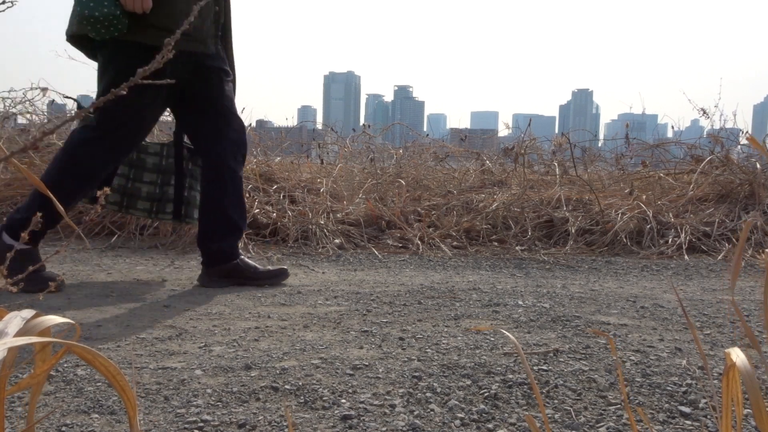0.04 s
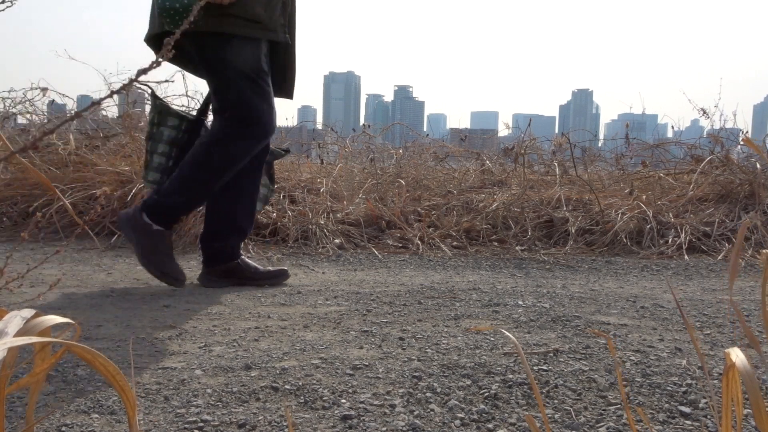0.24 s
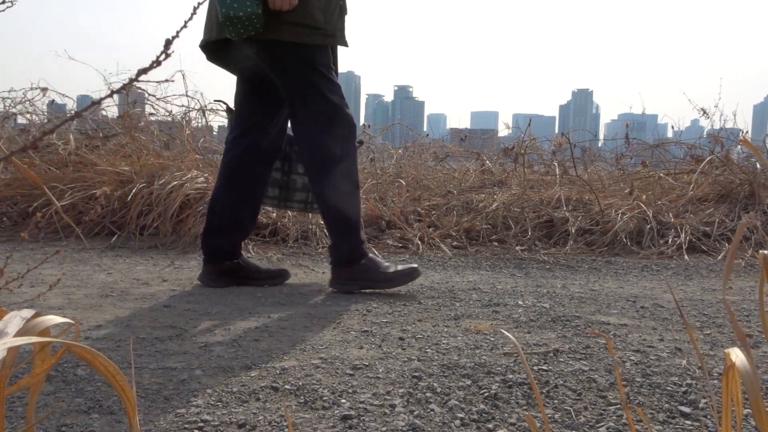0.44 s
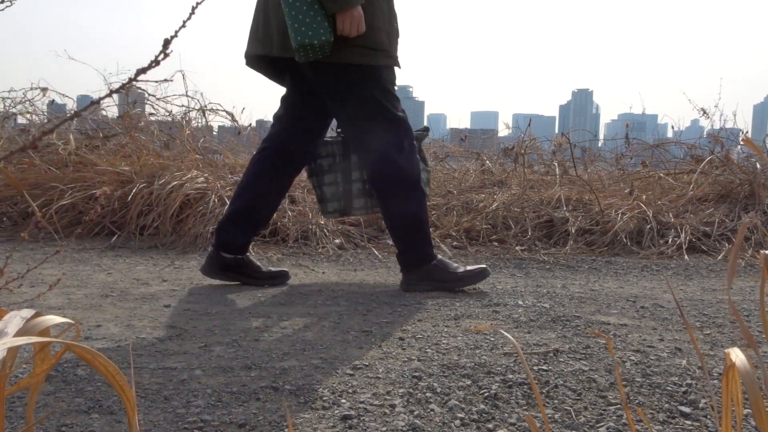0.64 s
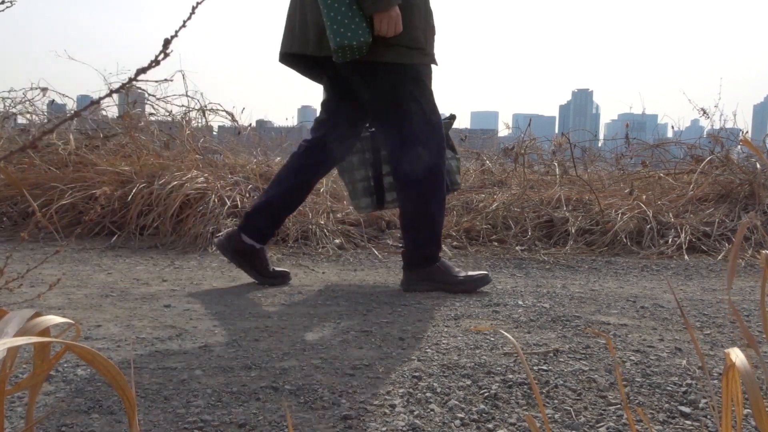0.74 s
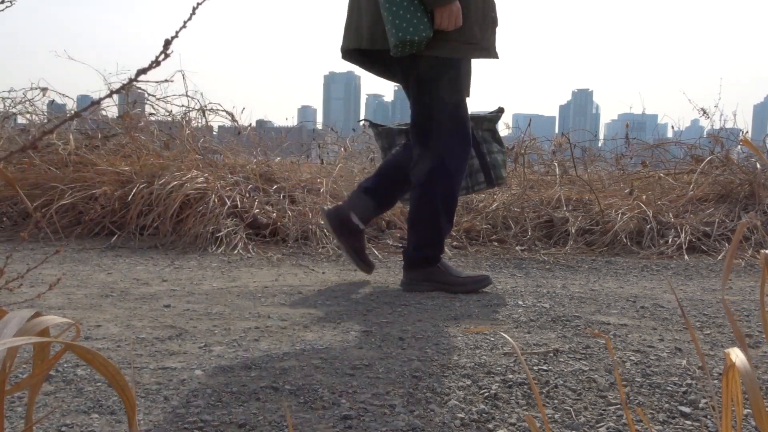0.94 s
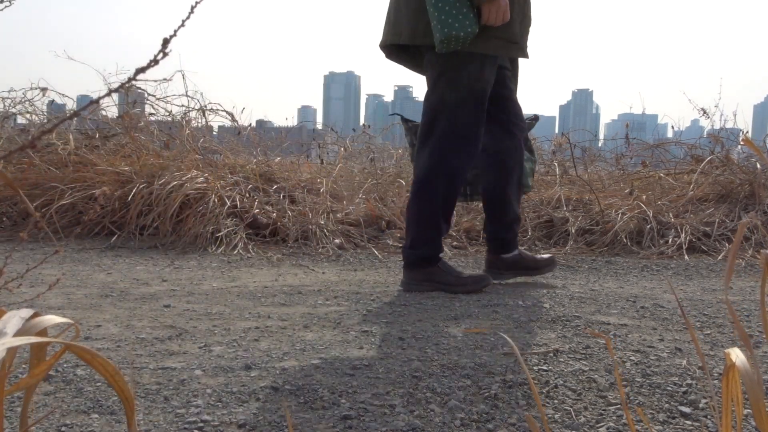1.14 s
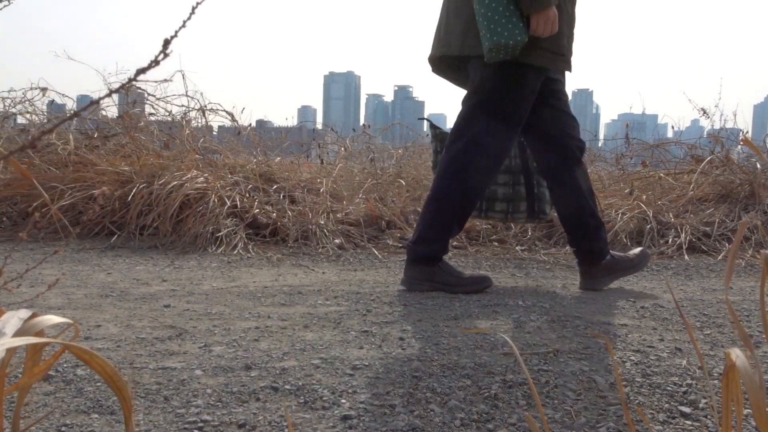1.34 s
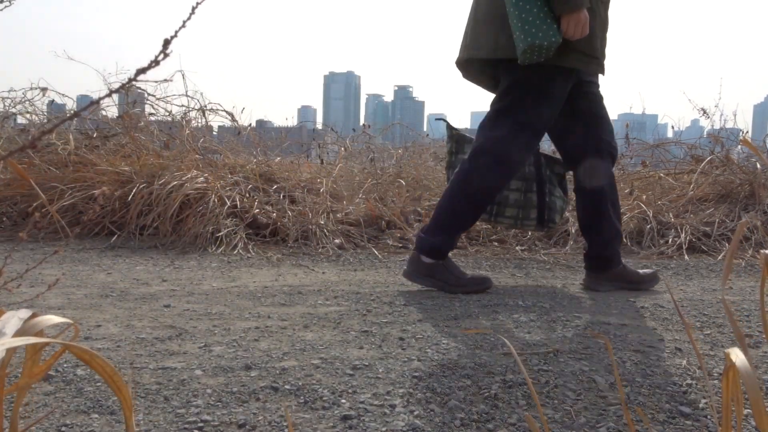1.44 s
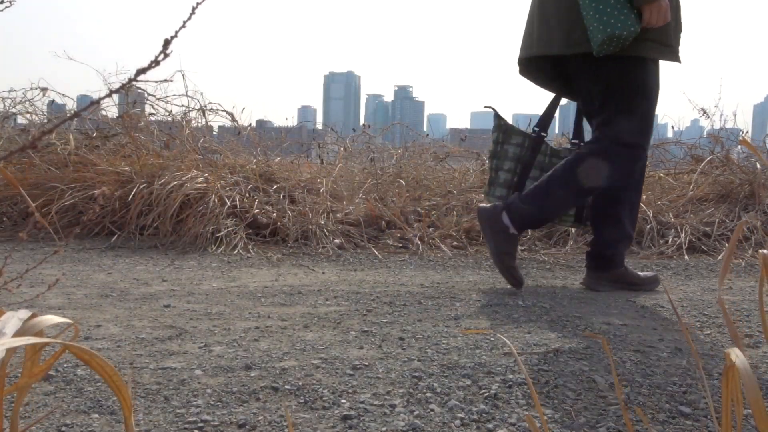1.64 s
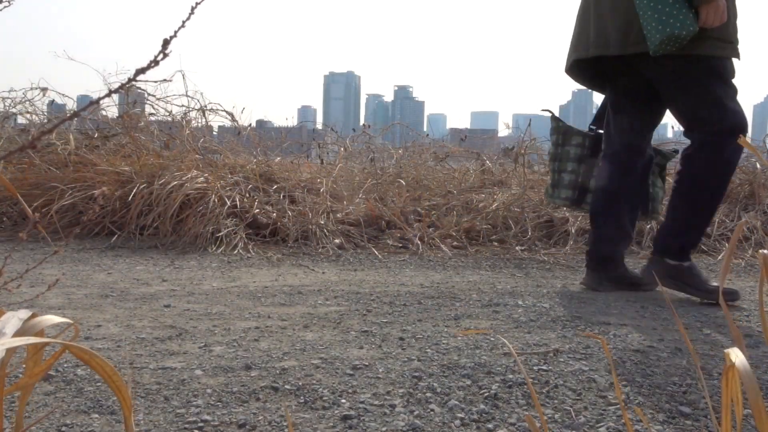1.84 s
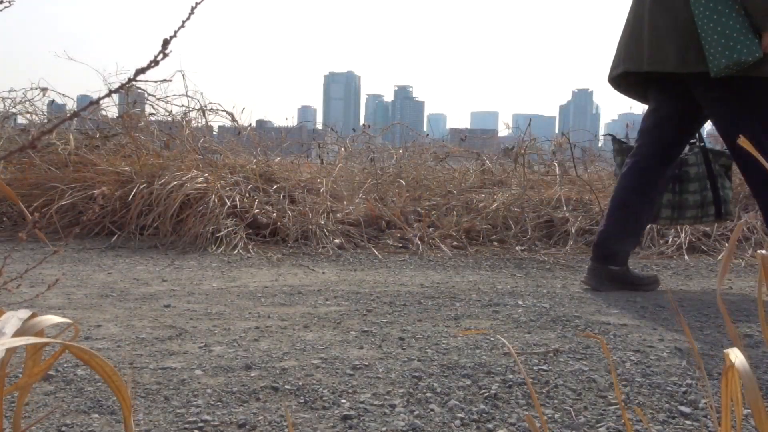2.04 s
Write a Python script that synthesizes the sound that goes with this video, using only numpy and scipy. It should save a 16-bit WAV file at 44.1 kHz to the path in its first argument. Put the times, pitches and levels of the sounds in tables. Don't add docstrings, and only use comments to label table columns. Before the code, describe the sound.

Footsteps crunching on gravel, hard soles walking past close by from left to right outdoors

```python
import sys
import numpy as np
from scipy import signal
from scipy.io import wavfile
from scipy.ndimage import uniform_filter1d, map_coordinates

SR = 44100
rng = np.random.default_rng(int(sys.argv[2]) if len(sys.argv) > 2 else 0)


def bounce(signal):
    frames = np.transpose(np.atleast_2d(signal))
    limited = np.clip(frames, -1, 1)
    pcm = np.round(limited * 32767).astype(np.int16)
    wavfile.write(sys.argv[1], SR, pcm)


def invert_db(x):
    u = np.asarray(x, float) / 20
    return 10 ** u


N = 92213

# pitch_hz, level_db (per Hz)
WASH_TONE = [(18, -47), (30, -11), (202, -5), (395, -6.5), (425, -3.5), (481, -0.5), (698, -2.5),
             (1540, -5.5), (11200, -27), (14600, -92), (22000, -120)]
# pitch_hz, likeness (1 = same)
WASH_LIKENESS = [(60, 0.99), (130, 1.0), (260, 0.98), (560, 0.93), (1170, 0.5), (2460, 0.11), (5170, 0.027),
                 (10900, 0.05)]
# pitch_hz, level_db
WASH_LEAN = [(60, 0), (400, -.3), (1100, -2), (2000, -2.5), (10900, -.5)]
# pitch_hz, width_hz, level_db
HUMS = [(381.4, 46, -63), (450, 65, -72)]
# time_s, level_db
HUM_SWELL = [(0, -4), (.12, 4), (.3, -7.5), (.7, 3), (.9, -6), (1.15, -6), (1.3, 1), (1.6, -5.5), (1.85, 4),
             (2.09, -7)]
# start_s, length_s, level_db, pitch_hz, width_hz
SQUEAKS = [(.1, .04, -57, 2040, 90), (.12, .09, -54, 1545, 70), (.195, .06, -56, 1545, 70),
           (.26, .05, -59, 1545, 70), (.125, .035, -58, 1800, 90), (.15, .07, -54, 1905, 60),
           (.21, .045, -53, 1905, 80), (.25, .05, -59, 1890, 60), (.185, .045, -59, 2160, 70),
           (.24, .08, -56, 2160, 90), (.325, .03, -63, 2130, 100), (.255, .035, -55, 970, 110),
           (.452, .035, -53, 1334, 120), (.655, .018, -48, 1600, 600), (0, .22, -64, 5400, 1600),
           (.2, .35, -70, 5400, 1400), (1.55, .04, -50, 4700, 1800)]
# peak_s, peak_db, pitch_hz
PEBBLES = [(0.0085, -49, 4380), (0.0444, -41, 2000), (0.0546, -42, 2770), (0.113, -56, 4380),
           (0.1424, -54, 5330), (0.1599, -38, 2430), (0.2227, -53, 3840), (0.2255, -52, 3600),
           (0.2257, -56, 4990), (0.2499, -58, 5330), (0.2584, -57, 5330), (0.2584, -54, 3370),
           (0.2629, -46, 800), (0.2686, -42, 1040), (0.3712, -49, 1350), (0.4567, -48, 850),
           (0.4582, -47, 1870), (0.5271, -48, 1750), (0.5695, -52, 2430), (0.6503, -41, 1180),
           (0.6625, -38, 1640), (0.666, -39, 1440), (0.6897, -36, 1180), (0.6917, -36, 1180),
           (0.7004, -34, 2770), (0.754, -43, 910), (0.7765, -47, 3160), (0.8191, -46, 1110),
           (0.9129, -53, 2770), (1.1716, -48, 1440), (1.2928, -49, 2430), (1.317, -46, 1640),
           (1.3933, -42, 2130), (1.4066, -51, 4100), (1.4098, -42, 2770), (1.4674, -37, 2770),
           (1.5205, -37, 1540), (1.5557, -45, 4680), (1.5607, -37, 4990), (1.5629, -36, 4380),
           (1.5677, -30, 2280), (1.5687, -43, 4680), (1.5717, -35, 970), (1.5822, -44, 5690),
           (1.5834, -33, 1870), (1.6128, -40, 970), (1.6298, -46, 2770), (1.6433, -52, 4380),
           (1.647, -42, 1180), (1.6607, -46, 2770), (1.664, -60, 8430), (1.6949, -44, 2430),
           (1.7388, -46, 2130), (1.7475, -46, 750), (2.0818, -48, 2590), (2.0818, -39, 850)]
# peak_s, peak_db, pitch_hz
CHIPS = [(.56, -42, 4750), (.5597, -52, 5850), (.5597, -65, 7500), (.878, -42, 3630), (.6972, -42.5, 4230),
         (1.4146, -30.5, 3850), (1.5655, -35, 1280), (.6893, -34.5, 3300), (.7115, -50, 2180),
         (.7135, -50, 1900), (1.4146, -53, 7700), (1.8097, -49, 4720), (1.8097, -51.5, 6040),
         (1.9782, -61, 5800), (2.0755, -48, 2000), (2.0835, -47, 700), (2.086, -43, 1140)]
# peak_s, peak_db, pitch_hz, brightness_db
STONE_CRACKS = [(0.0037, -26, 1910, -15), (0.0219, -35, 1570, -17), (0.055, -34, 1360, -9),
                (0.0781, -40, 1800, -12), (0.135, -37, 1840, -20), (0.161, -41, 2400, -18),
                (0.1665, -40, 1980, -5), (0.2234, -43, 1610, -11), (0.2568, -42, 1390, -15),
                (0.4672, -50, 1370, -1), (0.4967, -47, 1320, -5), (0.5595, -36, 2550, -1),
                (0.5768, -41, 2110, -18), (0.6505, -38, 710, -9), (0.6567, -38, 2970, -4),
                (0.6746, -28, 2900, -7), (0.6762, -26, 1640, -19), (0.6865, -31, 1730, -17),
                (0.6917, -28, 2590, -24), (0.6968, -23, 3100, -22), (0.6973, -18, 1640, -21),
                (0.7007, -26, 1510, -19), (0.7277, -36, 2980, -14), (0.7398, -40, 2270, -3),
                (0.7624, -38, 2710, -7), (0.7928, -37, 1430, -20), (0.8254, -39, 1550, -16),
                (0.8499, -40, 2390, -10), (0.878, -30, 2470, -16), (0.8788, -35, 2200, -17),
                (1.3015, -39, 1930, -16), (1.3895, -40, 3330, -11), (1.3994, -35, 2730, -16),
               (1.41, -38, 2030, -3), (1.4148, -8, 2060, -29), (1.4182, -30, 1820, -18),
               (1.4331, -34, 2010, -11), (1.4502, -27, 2350, -11), (1.4672, -35, 3000, -6),
               (1.4685, -32, 1320, -14), (1.4885, -33, 2220, -11), (1.5118, -34, 980, -14),
               (1.5303, -22, 2240, -23), (1.552, -29, 2030, -17), (1.5545, -31, 1100, -20),
               (1.558, -29, 2580, -13), (1.5607, -36, 2400, -3), (1.5633, -25, 2340, -12),
               (1.5677, -36, 2240, -15), (1.5717, -24, 2290, -15), (1.5748, -23, 2310, -23),
               (1.5768, -24, 2010, -12), (1.5835, -26, 1020, -18), (1.5855, -30, 1560, -15),
               (1.6641, -29, 2300, -17), (1.6946, -38, 800, -9), (1.8089, -51, 3120, -1),
               (1.9782, -49, 3000, 1), (2.0771, -38, 1440, -17), (2.0835, -39, 950, -14)]
# time_s, level_db
STEP_LOADS = [
    [(0, -44), (.05, -51), (.16, -54), (.28, -56.5), (.33, -60.5), (.5, -63), (.6, -63.5)],
    [(.61, -68), (.65, -47), (.69, -44), (.705, -48.5), (.76, -51), (.85, -55), (.92, -62.5), (1.1, -66.5),
     (1.33, -61.5)],
    [(1.365, -61.5), (1.4, -47.5), (1.46, -49), (1.543, -46), (1.553, -39), (1.579, -41), (1.59, -51),
     (1.72, -56), (1.9, -61.5)],
    [(1.91, -61.5), (2.06, -61.5), (2.08, -56), (2.1, -32.5)],
]
# pitch_hz, level_db (per Hz)
GRIT_TONE = [(300, -19.5), (700, -9), (1000, -10), (2200, -0.5), (3500, -15), (5800, -23), (7000, -33),
             (11000, -34)]
# time_s, tilt_db (per octave above FIZZ_HZ)
FIZZ = [(0, 2.2), (.5, -4), (.62, 1), (1, 5), (1.4, 5), (1.565, 1.5), (1.7, 6.5), (2.09, 0)]

WASH_DB = -56
PEBBLE_S, CHIP_S, PEBBLE_DB = .00065, .001, 1
CRACK_S = .00039
TICK_HZ, TICK_S, TICK_DB = 4900, .00028, 1.5
AIR_HZ, AIR_DB = 8200, -13
THUD_HZ, THUD_DB = 500, -27
GRAINS_PER_S, GRAIN_SIZES, GRAIN_CYCLES = 11000, 30, 4
GRAIN_SPREAD_DB, CLUMP_DB, FIZZ_HZ = 2.9, 1.3, 2600
SCATTER_DB, SCATTER_T60_S = -15, .025
PAN_START_DB, PAN_END_DB, PAN_ABOVE_HZ = -.5, -6.8, 950
LAG_START, LAG_END = -1, 2.4
LOW_CUT_HZ, EDGE_HZ = 73, 11200


def evened(x):
    return x / np.sqrt(np.mean(x ** 2) + 1e-20)


def read(points, hz):
    f, value = np.transpose(points)
    return np.interp(np.log(hz + 1), np.log(f + 1), value)


def over_time(points):
    return np.interp(np.arange(N) / SR, *np.transpose(points))


def add(mix, s, sound):
    part = mix[max(round(s * SR), 0):][:len(sound)]
    part += sound[:len(part)]


def knock(hz, rise_s, size=400):
    u = np.arange(size) / SR / rise_s
    shape = (u * np.exp(1 - u)) ** 2
    x = shape * np.cos(2 * np.pi * hz * rise_s * (u - .72))
    return x - shape * x.sum() / shape.sum()


def resonate(x, hz, width):
    turn = np.exp(2j * np.pi * hz * np.arange(x.shape[-1]) / SR)
    r = np.exp(-np.pi * width / SR)
    return 2 * (turn * signal.lfilter([1 - r], [1, -r], x / turn)).real


def far_wash():
    frames, hz = N // 256 + 5, np.fft.rfftfreq(1024, 1 / SR)
    a, b, c, d, patches = rng.standard_normal((frames, 513, 5)).T
    patches = uniform_filter1d(uniform_filter1d(patches, size=10, axis=0), size=12, axis=1)
    patches = evened(patches)
    same = np.clip(read(WASH_LIKENESS, hz), -1, 1)[:, None]
    left = a + 1j * b
    right = same * left + np.sqrt(1 - same ** 2) * (c + 1j * d)
    lean = np.array([.5, -.5])[:, None, None] * read(WASH_LEAN, hz)[:, None]
    z = np.array([left, right]) * invert_db(read(WASH_TONE, hz)[:, None] + 0.29 * patches + lean)
    return invert_db(WASH_DB) * evened(signal.istft(z, nperseg=1024, noverlap=768)[1][:, :N])


def machine_hum():
    hum = np.zeros(N)
    for hz, width, db in HUMS:
        hum += invert_db(db) * evened(resonate(rng.standard_normal(N), hz, width))
    return invert_db(over_time(HUM_SWELL)) * hum


def sole_squeaks():
    out = np.zeros(N)
    for s, length, db, hz, width in SQUEAKS:
        n = int(length * SR)
        jerks = rng.standard_normal(18000) ** 3
        rub = resonate(resonate(jerks, hz, width), hz, width)[-n:]
        add(out, s, invert_db(db) * np.sqrt(np.hanning(n)) * evened(rub))
    return out


def knocked_pebbles():
    out = np.zeros(N)
    for rows, rise_s in ((PEBBLES, PEBBLE_S), (CHIPS, CHIP_S)):
        for s, db, hz in rows:
            add(out, s - rise_s, invert_db(db + PEBBLE_DB) * knock(hz, rise_s))
    return out


def cracking_stones():
    out = np.zeros(N)
    for s, db, hz, bright_db in STONE_CRACKS:
        rise_s = CRACK_S * np.sqrt(2100 / hz)
        add(out, s - rise_s, invert_db(db - 0.5) * knock(hz, rise_s))
        thud_s = .5 / THUD_HZ
        add(out, s - thud_s, invert_db(db + THUD_DB) * knock(THUD_HZ, thud_s))
        tick = knock(TICK_HZ * (1 + .06 * rng.uniform(-1, 1)), TICK_S)
        tick += invert_db(AIR_DB) * knock(AIR_HZ, TICK_S / 2)
        add(out, s - TICK_S, invert_db(db + bright_db + TICK_DB) * tick)
    return signal.sosfilt(signal.butter(2, 680, "high", fs=SR, output="sos"), out)


def grinding_gravel():
    clump = uniform_filter1d(uniform_filter1d(rng.standard_normal(N), size=200), size=200)
    clump = evened(clump)
    fizz = over_time(FIZZ)
    out = np.zeros((2, N))
    for hz in np.geomspace(480, 10500, GRAIN_SIZES):
        strength, chance, sign, side = rng.random((N, 4)).T
        hits = invert_db(GRAIN_SPREAD_DB * np.minimum(-np.log(strength + 1e-9), 3))
        hits *= chance < GRAINS_PER_S / GRAIN_SIZES / SR
        hits *= invert_db(fizz * max(np.log2(hz / FIZZ_HZ), 0))
        hits *= np.sign(sign - .5)
        grain = knock(hz, GRAIN_CYCLES / 4 / hz)
        grain *= invert_db(read(GRIT_TONE, hz)) * np.sqrt(hz) / np.linalg.norm(grain)
        place = invert_db(1.1 * (2 * side - 0.5))
        both = np.array([hits * place, hits / place])
        out += signal.oaconvolve(both, grain[None], axes=1)[:, :N]
    return evened(out) * invert_db(over_time(sum(STEP_LOADS, [])) + CLUMP_DB * clump)


def ground_scatter(x):
    t = np.arange(2000) / SR
    taps = rng.standard_normal((2, 2000)) * (rng.random((2, 2000)) < .05)
    taps *= invert_db(-60 * t / SCATTER_T60_S) * (t > .001)
    return signal.oaconvolve(x, taps / np.linalg.norm(taps, axis=1)[:, None], axes=1)[:, :N]


def walk_past(feet):
    way = np.arange(N) / N
    pan_db = PAN_START_DB + (PAN_END_DB - PAN_START_DB) * way
    lag = LAG_START + (LAG_END - LAG_START) * way
    left = map_coordinates(feet[0], [np.arange(N) - lag], order=3, mode="nearest")
    feet = np.array([left, feet[1]])
    low = signal.sosfiltfilt(signal.butter(1, PAN_ABOVE_HZ, fs=SR, output="sos"), feet)
    return low + (feet - low) * invert_db([pan_db / 2, -pan_db / 2])


def scene():
    feet = grinding_gravel() + cracking_stones() + knocked_pebbles() + sole_squeaks()
    feet = feet + invert_db(SCATTER_DB) * ground_scatter(feet)
    return walk_past(feet) + far_wash() + machine_hum()


def roll_off(x):
    return signal.sosfilt(signal.butter(12, 11460, fs=SR, output="sos"), x)


def record(dry):
    x = signal.sosfilt(signal.butter(2, LOW_CUT_HZ, "high", fs=SR, output="sos"), dry)
    treble_cut = signal.firwin(255, EDGE_HZ, window=("kaiser", 9), fs=SR)
    mix = signal.oaconvolve(x, treble_cut[None], "same")
    return roll_off(mix)


dry = scene()
out = record(dry)
bounce(out)
```